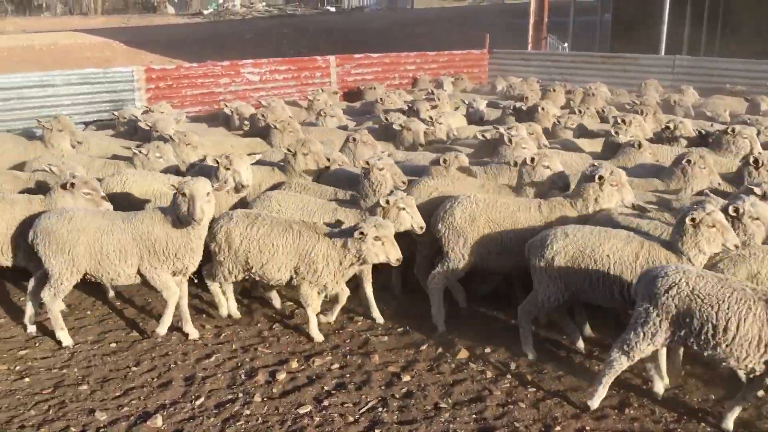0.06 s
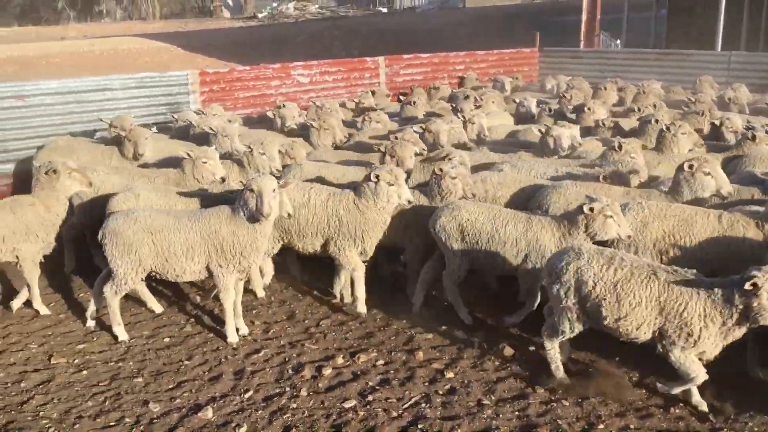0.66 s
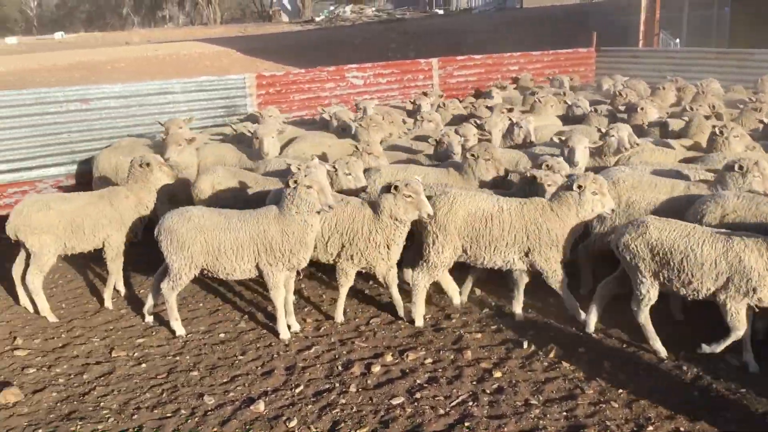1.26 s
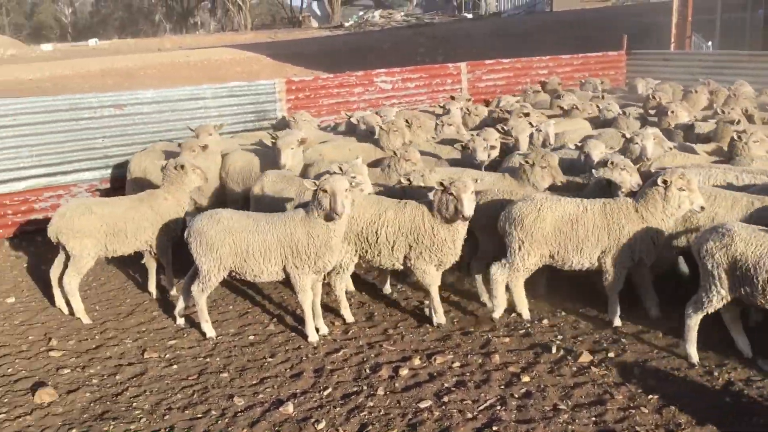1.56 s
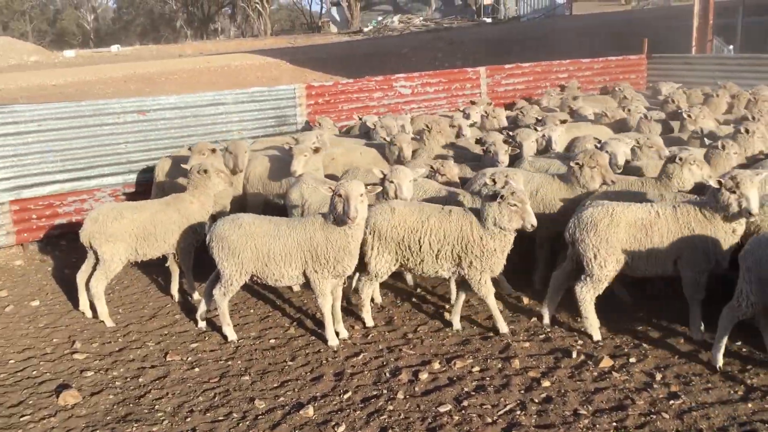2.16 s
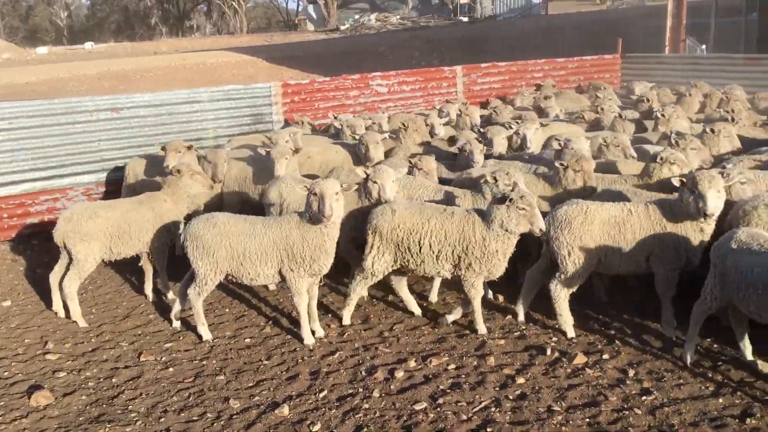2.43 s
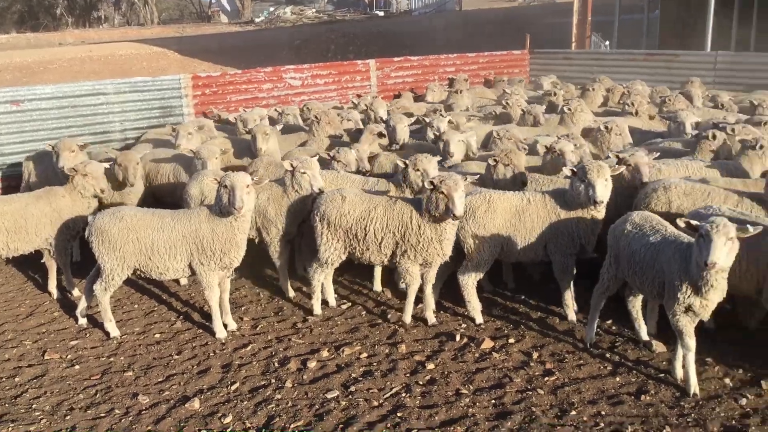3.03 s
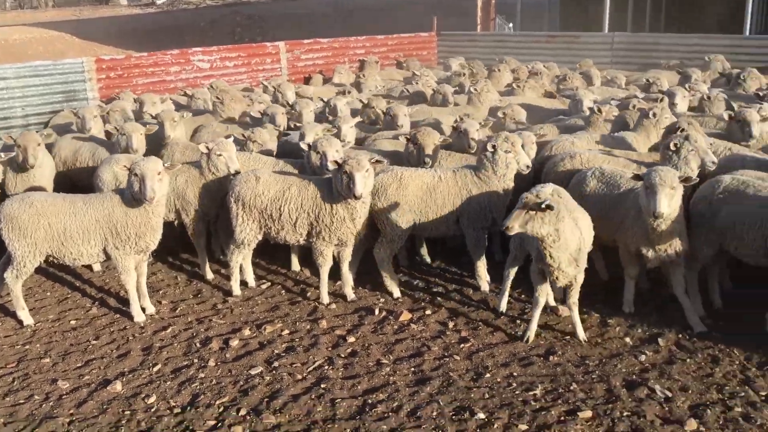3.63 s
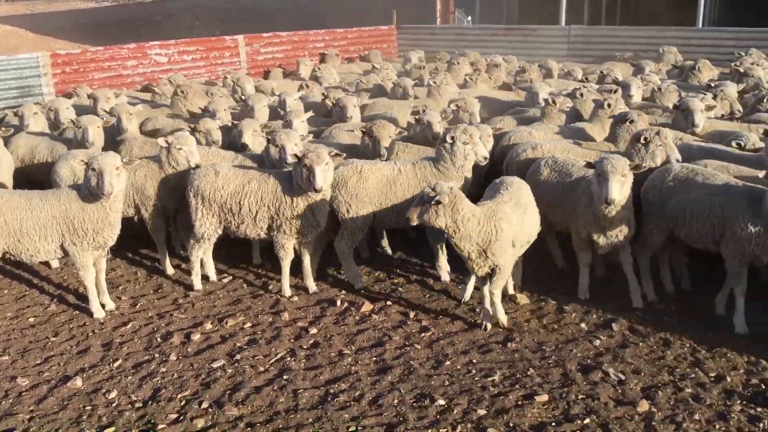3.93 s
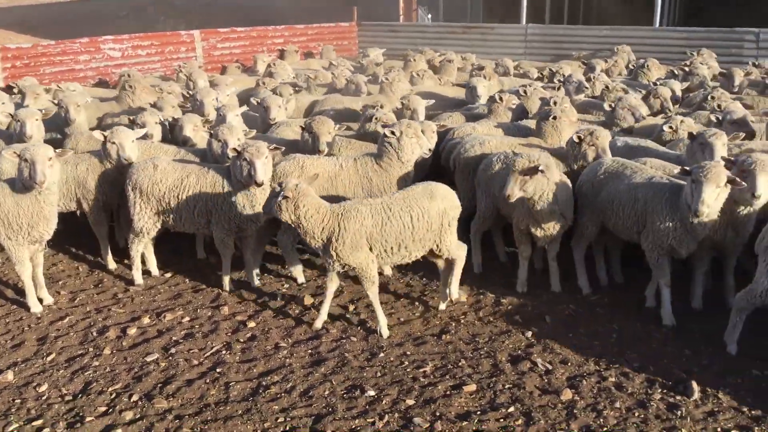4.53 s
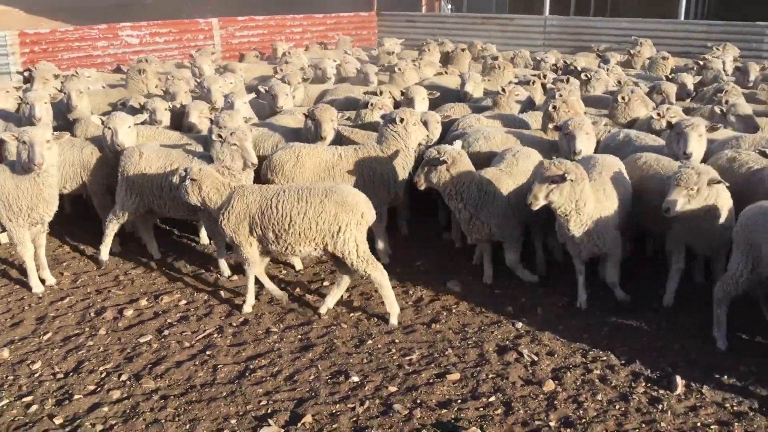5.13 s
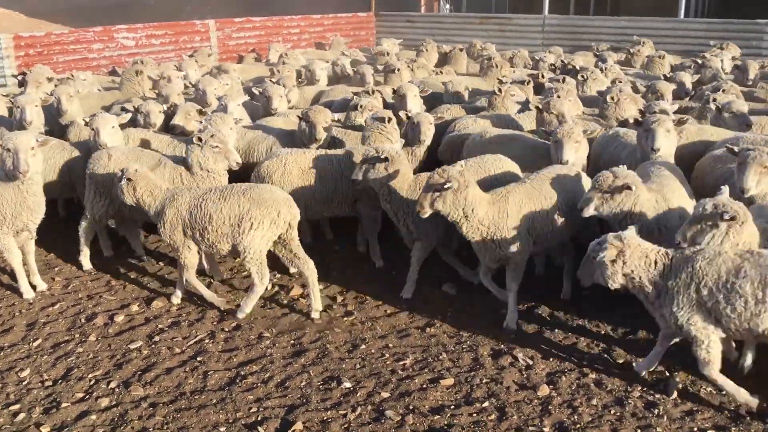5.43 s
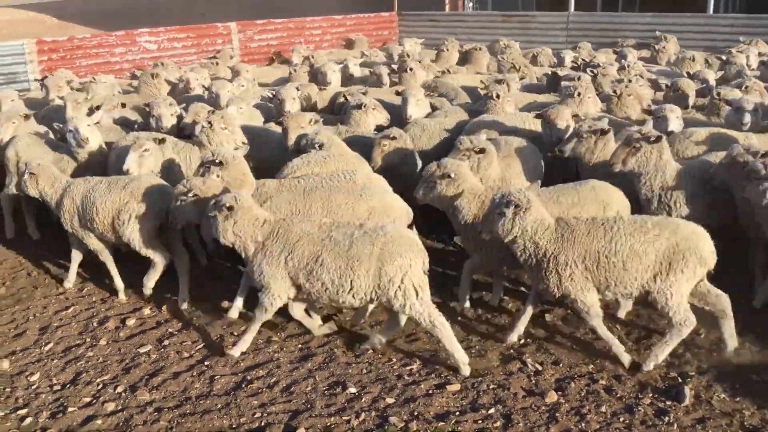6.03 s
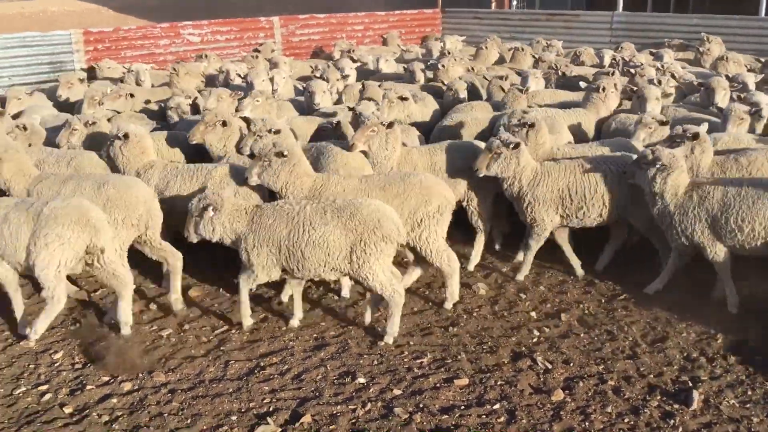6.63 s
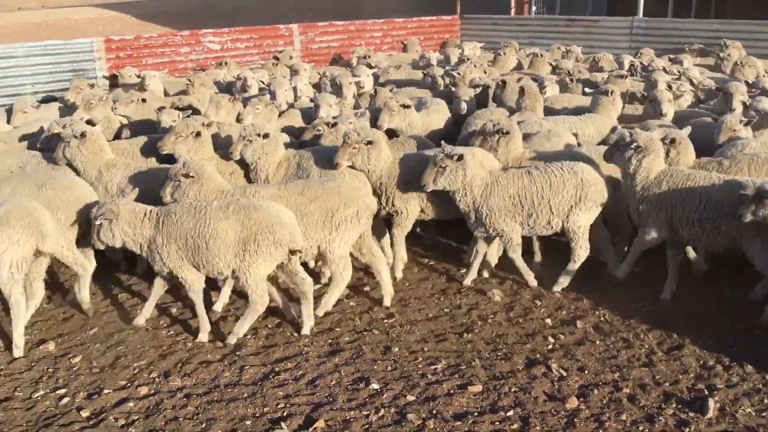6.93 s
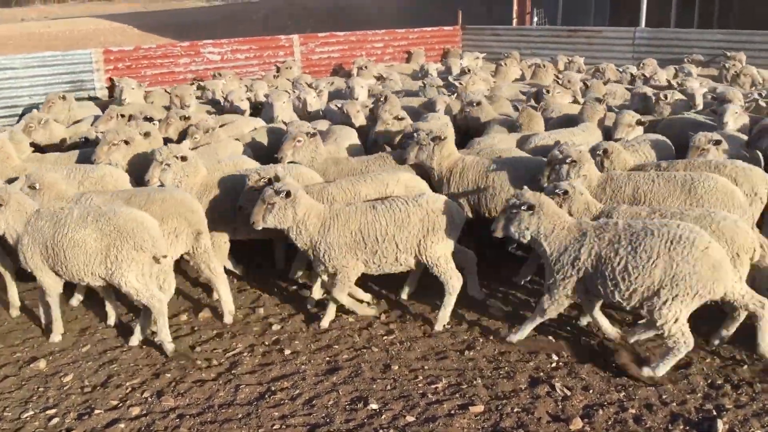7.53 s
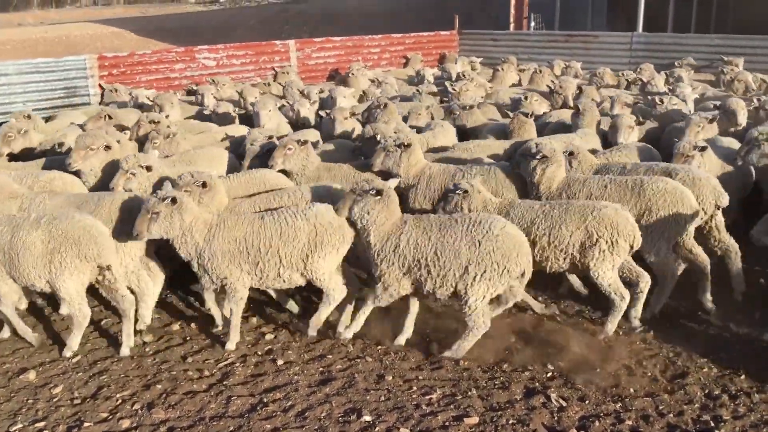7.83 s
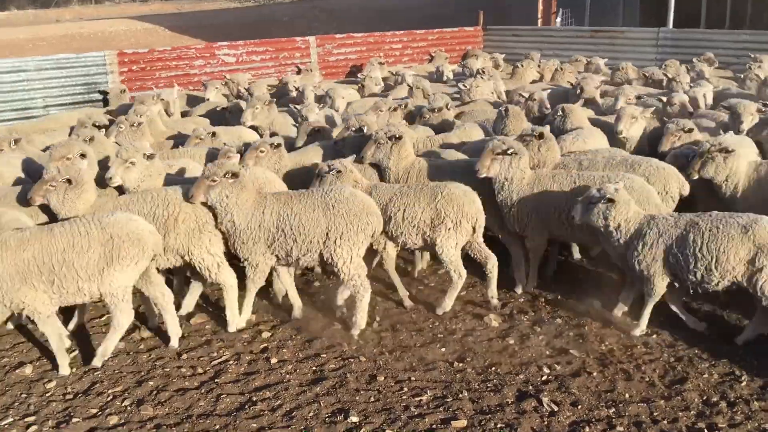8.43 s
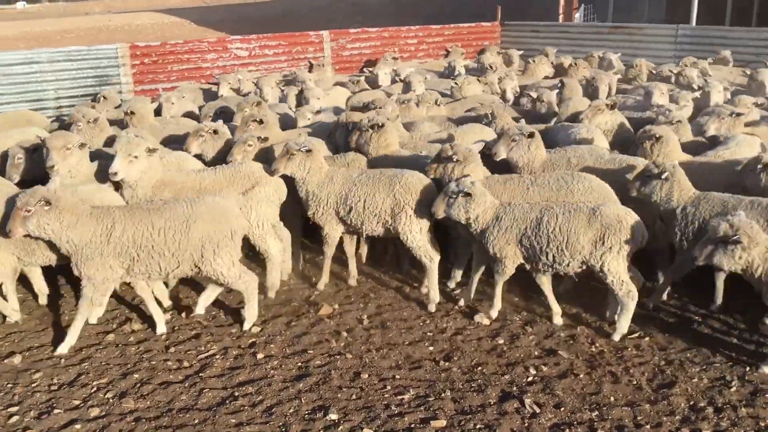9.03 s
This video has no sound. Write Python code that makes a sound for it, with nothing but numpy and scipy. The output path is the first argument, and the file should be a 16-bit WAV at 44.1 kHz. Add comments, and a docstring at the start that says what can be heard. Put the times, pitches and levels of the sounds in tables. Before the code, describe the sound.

Many sheep shuffle on dry dirt in an outdoor yard, their hooves softly crunching grit, scuffing and clicking against pebbles, while light wind puffs at the close microphone. The flock almost stops. About halfway through, a strong gust buffets the microphone with low thumps, the loudest sound. As it eases, the sheep run past with busier steps and scrapes under continuing puffs of wind.

```python
"""A dry dirt yard, one microphone close to a flock of sheep. At first they shuffle: near hooves thud,
crush grit, scuff and kick pebbles, far ones merge into a rustle, and wind puffs at the microphone.
From about 2 s the flock almost stops and fleeces brush softly. Near 5 s one strong gust buffets the
microphone with thumping eddies. As it eases the sheep run past, and something small tinks underfoot."""
import sys
import numpy as np
from scipy import signal
from scipy.fft import rfft, irfft
from scipy.io import wavfile
from scipy.ndimage import uniform_filter1d, map_coordinates

SR = 44100
rng = np.random.default_rng(int(sys.argv[2]) if len(sys.argv) > 2 else 0)


def to_wav(sig):
    """Store sig (one row per channel, or 1-D mono) as 16-bit WAV at the path in sys.argv[1].

    Samples outside -1..1 are clipped; the rate is SR.
    """
    pcm = np.clip(np.atleast_2d(sig), -1, 1) * 32767
    pcm = np.round(pcm).astype(np.int16)
    wavfile.write(sys.argv[1], SR, pcm.T)  # frames by channels


N = 408807
TIME = np.arange(N) / SR

# how busy the flock is; it shuffles, almost stops, then runs: (time [s], level [dB])
FLOCK_ACTIVITY = [(0, -60.5), (.17, -69.5), (.33, -66), (.95, -68.5), (1.3, -68.5), (1.92, -74),
                  (2.12, -71.5), (2.27, -77.5), (2.4, -73), (2.65, -75), (3.12, -71.5), (3.4, -74.5),
                  (4.4, -77), (5, -73), (5.55, -70), (5.9, -64.5), (6.95, -69.5), (7.7, -66.5), (9.26, -69)]
# fine grit is heard when the steps are close to the microphone: (time [s], treble [dB])
NEARNESS = [(0, -0.5), (6, -3), (7.3, 2.5)]
# the tone of hooves on dry dirt, with the microphone's rippled treble: (frequency [Hz], gain [dB])
GROUND_SOUND_COLOUR = [(120, -10), (330, 14), (620, 9.5), (950, 2.5), (1500, 0.5), (2700, -0.5),
                       (3500, -5.5), (4400, -5), (5000, -9.5), (5600, -7), (6300, -12), (7000, -9.5),
                       (8200, -19), (9600, -15.5), (11200, -19.5), (12500, -24), (15500, -18.5)]


def undb(db):
    """Decibels to gain."""
    return 10 ** (np.asarray(db) / 20)


def unit(x):
    """Scale to rms 1."""
    return x / np.sqrt(np.mean(x ** 2))


def curve(table):
    """Join (time, value) rows by straight lines."""
    return np.interp(TIME, *np.transpose(table))


def walk(rate):
    """Smooth random drift of rms 1, changing about rate times a second."""
    return unit(map_coordinates(rng.standard_normal(N // 20), [TIME * rate], order=3, mode="wrap"))


def edge(x, hz, kind, order=2):
    """Butterworth low-pass or high-pass."""
    return signal.sosfilt(signal.butter(order, min(hz, .45 * SR), kind, fs=SR, output="sos"), x)


def ring(x, hz, q):
    """One resonance, gain 1 at its centre."""
    return signal.lfilter(*signal.iirpeak(min(hz, .4 * SR), max(q, hz / (.4 * SR)), fs=SR), x)


def colour(x, points):
    """Minimum-phase filter through (frequency [Hz], gain [dB]) points."""
    hz, db = np.transpose(points)
    gain = undb(np.interp(np.log(np.fft.rfftfreq(2048, 1 / SR) + 1), np.log(hz), db))
    cepstrum = irfft(np.log(gain))
    half = len(cepstrum) // 2
    folded = np.r_[cepstrum[0], 2 * cepstrum[1:half], np.zeros(half)]
    return signal.fftconvolve(x, irfft(np.exp(rfft(folded))))[:len(x)]


def add(out, s, sound, db):
    """Mix a sound in at time s with a given peak level."""
    start = int(np.clip(s * SR, 0, N - 1))
    out[start:start + len(sound)] += (undb(db) * sound / np.abs(sound).max())[:N - start]


def impacts(rate, spread_db, size=N):
    """Impulses at random moments, most small and a few large."""
    return (rng.random(size) < rate / SR) * undb(spread_db * np.clip(rng.standard_normal(size), -2, 2))


def grains(rate, spread_db, size=N):
    """Breaking crumbs: impacts of either sign."""
    return impacts(rate, spread_db, size) * np.sign(rng.standard_normal(size))


def airflow(rise_s=.0022, fall_s=.023, lull_db=-8.5):
    """Wind strength at the microphone in dB: puffs ride on the breeze and lulls dip below it."""
    # the breeze, swelling to one strong gust: (time [s], level [dB])
    breeze = [(0, -53), (.6, -54), (.95, -50), (1.52, -50.5), (1.7, -57.5), (2.55, -50.5), (2.85, -54.5),
              (3.6, -47.5), (4.1, -49), (4.36, -53.5), (4.9, -33.5), (5.22, -27), (5.5, -34.5),
              (6.3, -44.5), (7.12, -51), (8.5, -51), (9.27, -47.5)]
    # separate puffs: (start [s], hold [s], level [dB])
    puffs = [(0.245, 0.05, -43), (0.977, 0.038, -44), (3.317, 0.042, -37.5), (4.914, 0.032, -30),
             (5.267, 0.036, -26.5), (5.358, 0.1, -37), (5.742, 0.039, -33.5), (5.868, 0.13, -36),
             (6.487, 0.06, -38), (6.878, 0.17, -38), (7.497, 0.038, -43), (8.09, 0.096, -40.5),
             (8.227, 0.093, -38), (8.72, 0.12, -42.5), (9.023, 0.11, -44.5), (9.238, 0.054, -38.5)]
    # the air drops away between gusts: (time [s])
    lulls = [.55, 2.8, 3.29, 4.36, 4.6, 4.78, 5.07, 5.33, 5.47, 5.68, 6.78, 7.12, 7.75, 8.42, 8.96]
    breeze_db = curve(breeze)
    power = undb(breeze_db) ** 2
    for s, hold, db in puffs:
        shape = np.interp(TIME, [s - rise_s, s, s + hold, s + hold + fall_s], [0, 1, 1, 0])
        power = power + (undb(db) * shape ** 2) ** 2
    lull_s = .05 * undb((np.median(breeze_db) - breeze_db) / 2)  # briefer in fast air
    dips = sum(np.exp(-((TIME - s) / lull_s) ** 2) for s in lulls)
    return 10 * np.log10(power) + lull_db * dips


def swirl(roll_hz):
    """The pressure pulse of one eddy; a quicker eddy reaches higher in pitch."""
    t = np.arange(-SR // 80, SR // 80) / SR
    return 1 / (1 + (2 * np.pi * roll_hz * t) ** 2) * np.hanning(len(t))


def mic_port(pressure, cut_hz=66):
    """The microphone port blocks slow pressure, booms above that limit and has small cavity resonances."""
    # how the port colours the wind: (frequency [Hz], gain [dB])
    port_tone = [(90, -1), (140, -1), (210, 2), (420, 3), (600, 9), (950, 6), (2000, 13.5)]
    passed = edge(pressure, cut_hz, "high", order=4)
    boom = .14 * ring(passed, 2.1 * cut_hz, q=35)
    return colour(passed + boom, port_tone)


def wind(size_spread_db=2, gain_db=1.96):
    """A stream of small eddies crosses the microphone: faster air makes them stronger and quicker."""
    # how quickly eddies pass; the late wind is slower and deeper: (time [s], base roll-off [Hz])
    eddy_pace = [(0, 145.5), (5.2, 151), (6.2, 125), (9.27, 102.5)]
    force_db = airflow()
    speed = undb(np.minimum(uniform_filter1d(force_db, size=900) + 25, 4)) ** .27
    roll_hz = curve(eddy_pace) * speed
    pressure = np.zeros(N)
    moments = rng.random(size=5000) * TIME[-1]
    for s, (size, pace, side) in zip(moments, rng.standard_normal((len(moments), 3))):
        eddy_hz = roll_hz[int(s * SR)] * undb(3.1 * np.clip(pace, -1.3, 1.3))
        pulse = np.sign(side) * swirl(eddy_hz)
        add(pressure, s - len(pulse) / 2 / SR, pulse, size_spread_db * size)
    pressure = unit(mic_port(pressure))
    # the stream is evened out so that it follows the strength of the gust
    power = uniform_filter1d(uniform_filter1d(pressure ** 2, size=1100), size=700)
    stream = pressure / np.sqrt(power + .02)
    # light air wavers more than a firm gust
    waver_db = 2 * walk(22) * np.interp(force_db, [-44, -34], [1.3, .5])
    return stream * undb(force_db + waver_db + gain_db)


def eddy_thumps():
    """The strongest eddies land as separate round thumps, each swinging the air at the port a few times."""
    # single strong eddies: (time [s], peak [dB], pitch [Hz])
    eddies = [(0.287, -30, 185), (0.689, -24, 140), (0.87, -30, 105), (1.029, -31, 90), (3.227, -33, 85),
              (3.344, -32, 170), (3.443, -30, 150), (3.714, -34, 330), (3.74, -30, 200), (4.158, -33, 135),
              (4.458, -31, 110), (4.541, -25, 150), (4.564, -25, 200), (4.646, -24, 155), (4.708, -29, 300),
              (4.813, -21, 215), (4.874, -16.5, 135), (4.921, -20, 170), (5.003, -21, 245),
              (5.03, -18, 180), (5.108, -17, 190), (5.124, -14, 260), (5.171, -13.5, 170),
              (5.186, -20, 380), (5.288, -15, 220), (5.365, -19, 400), (5.384, -15.5, 90),
              (5.395, -17, 210), (5.419, -13, 290), (5.51, -18.5, 205), (5.544, -15, 170),
              (5.633, -23, 140), (5.713, -21, 155), (5.751, -20, 110), (5.776, -21.5, 190),
              (5.948, -22, 125), (5.978, -23, 230), (6.124, -19.5, 160), (6.175, -29, 185),
              (6.226, -23.5, 280), (6.413, -26.5, 240), (6.499, -23, 240), (6.519, -26.5, 250),
              (6.547, -25.5, 105), (6.891, -26.5, 220), (6.916, -24, 175), (6.975, -23.5, 115),
              (7.051, -28, 120), (7.319, -30, 150), (7.552, -31, 140), (8.166, -23.5, 115),
              (8.242, -26, 175), (8.278, -26.5, 130), (8.304, -25, 160), (8.663, -31, 120),
              (8.773, -25.5, 82), (8.855, -28, 100)]
    out = np.zeros(N)
    for s, db, hz in eddies:
        steepness = undb(.76 * max(db + 17, 0))  # the hardest have a steep front that reaches higher
        dip = -swirl(hz * steepness)
        push = np.pad(dip, (0, 2 * len(dip)))
        thump = mic_port(ring(push, hz, q=2.2) + .17 * push)
        add(out, s - np.abs(thump).argmax() / SR, thump, db)
    return out


def fleeces(rough_db=5.5):
    """Wool rubs on wool: a soft hiss that swells and fades."""
    # fleeces brushing past each other: (start [s], length [s], level [dB])
    brushes = [(2.317, 0.27, -74.5), (2.815, 0.16, -74.5), (3.054, 0.18, -74)]
    # the sheen of rubbed wool: (frequency [Hz], gain [dB])
    wool_tone = [(800, -18), (2400, 1), (3600, -11), (5300, -3), (7500, -17), (15000, -38)]
    swell = sum(undb(db) * np.sin(np.pi * np.clip((TIME - s) / length, 0, 1))
                for s, length, db in brushes)
    return swell * undb(rough_db * walk(60)) * unit(colour(rng.standard_normal(N), wool_tone))


def tink():
    """Something small and hard is kicked and rings high."""
    # its metallic modes: (frequency [Hz], relative level [dB], time to fall 60 dB [s])
    modes = [(9227, 0, .024), (13300, -7, .02)]
    out, t = np.zeros(N), TIME[:SR // 8]
    ringing = sum(undb(db - 60 * t / t60) * np.sin(2 * np.pi * hz * t) for hz, db, t60 in modes)
    add(out, s=6.425, sound=ringing, db=-46)
    return out


def chips(snap_db=-7, sand_db=-19, crisp=.22):
    """Stone chips snap under the nearest hooves and kicked sand sizzles, louder the busier the flock."""
    # each size of chip snaps at its own pitch: (pitch [Hz])
    chip_pitches = (2000, 3400, 5600, 9600)
    busy = undb(curve(FLOCK_ACTIVITY) + curve(NEARNESS))
    snaps = 0
    for hz in chip_pitches:
        cracks = grains(rate=7, spread_db=5)
        knocks = edge(cracks, hz / 2, "high", order=1) + 2 * ring(cracks, hz, q=3.2)
        snaps = snaps + colour(knocks, GROUND_SOUND_COLOUR) + crisp * cracks
    sand = edge(grains(rate=900, spread_db=8) * undb(2 * walk(30)), 12000, "high")
    return busy * (undb(snap_db) * unit(snaps) + undb(sand_db) * unit(sand))


def pebbles(gain_db=-1, body=2.35):
    """A sharp crack rings a pebble briefly; grit settles after it."""
    # hooves knocking pebbles: (time [s], peak before gain [dB], pitch [Hz])
    kicks = [(0.311, -39.5, 4000), (0.4574, -42, 2610), (1.138, -40, 3200), (1.201, -40.5, 2400),
             (1.958, -38, 3300), (2.116, -44.5, 6260), (2.458, -42.5, 2360), (2.801, -45, 2700),
             (3.088, -47, 5500), (3.098, -45, 4900), (4.65, -43, 2920), (5.326, -32.5, 4700),
             (5.361, -36.5, 6640), (6.271, -43, 3090), (6.596, -43.5, 6800), (6.744, -41, 2600),
             (6.772, -43, 3800), (7.062, -43, 6500), (7.078, -44, 8000), (7.168, -40.5, 4600),
             (7.243, -38.5, 9600), (7.44, -42, 2110), (7.483, -37, 5900), (7.704, -36, 7000),
             (7.838, -37.5, 10700), (8.332, -38, 2300), (8.404, -40.5, 2700), (8.612, -39, 5000),
             (8.707, -40, 11200), (8.822, -42.5, 4000), (8.968, -36.5, 5660), (9.049, -38, 5000),
             (9.109, -38, 2900), (9.202, -41, 13400)]
    out, t = np.zeros(N), TIME[:SR // 15]
    contact = (1 - np.exp(-t / .0003)) * np.exp(-t / .0008)
    settling = .12 * np.exp(-t / .008)
    for s, db, hz in kicks:
        crack = contact * rng.standard_normal(len(t))
        crack += settling * unit(grains(rate=3600, spread_db=17, size=len(t)))
        # a smaller stone radiates less bass and snaps more brightly
        knock = edge(crack, hz / 4, "high", order=1) + body * ring(crack, hz, q=2.7)
        snap = hz / 32000 * edge(crack, 6000, "high", order=1)
        add(out, s, colour(knock, GROUND_SOUND_COLOUR) + snap, db + gain_db)
    return out


def scuffs(gain_db=-9, body=.83):
    """A sliding hoof tears up a spray of grains that builds over its slide time and dies away."""
    # hooves scraping the dirt: (time [s], peak before gain [dB], pitch [Hz], slide [s])
    slides = [(0.056, -33, 1260, .004), (0.09, -33, 1140, 0.0032), (0.27, -36.5, 1400, 0.011),
              (0.432, -39, 2000, 0.0084), (0.886, -32, 1480, 0.0033), (1.135, -31, 1900, 0.0022),
              (1.26, -32, 1230, 0.0049), (1.3863, -38, 2470, 0.0074), (1.862, -38, 1520, 0.0072),
              (2.92, -44, 2200, 0.038), (4.314, -44, 1700, 0.0087), (4.519, -36, 2400, 0.011),
              (5.7432, -35.5, 1170, 0.0044), (5.792, -31, 1380, 0.0027), (7.252, -26, 1490, 0.0047),
              (7.818, -32.5, 1900, 0.011), (7.934, -32, 2300, 0.0036), (8.294, -32.5, 2550, 0.0064),
              (8.364, -35, 2360, 0.0084)]
    out, t = np.zeros(N), TIME[:SR // 5]
    for s, db, hz, slide_s in slides:
        spray = grains(rate=4000, spread_db=9, size=len(t)) * t * np.exp(-t / slide_s)
        scrape = colour(spray + body * ring(spray, hz, q=4.7), GROUND_SOUND_COLOUR)
        add(out, s - .004, scrape, db + gain_db)
    return out


def stamps():
    """A hoof lands flat with a short hollow knock."""
    # hooves stamping on packed earth: (time [s], peak [dB], pitch [Hz])
    landings = [(0.661, -41, 670), (2.106, -47.5, 596)]
    out, t = np.zeros(N), TIME[:SR // 15]
    for s, db, hz in landings:
        blow = rng.standard_normal(len(t)) * np.exp(-t / .003)
        add(out, s, edge(ring(blow, hz, q=3.1), 1300, "low"), db)
    return out


def footfalls(rate, spread_db, crush_s):
    """Pressure of many hooves on the ground: each step builds quickly and dies away."""
    t = TIME[:SR // 4] / crush_s
    load = signal.fftconvolve(impacts(rate, spread_db) ** 2, t * np.exp(-t))[:N].clip(0)
    return np.sqrt(load / (uniform_filter1d(load, size=SR // 3) + 1e-9))


def flock(grit_db=1.5, rustle_db=-1, thud_db=-9, floor_db=-72, hiss_db=-89):
    """Near steps thud and crush grit, far steps blur into a rustle, over a faint low murmur and hiss."""
    busy_db = curve(FLOCK_ACTIVITY) + 2.5
    # when the flock slows, the near sheep stand still first and the far rustle remains
    near = undb(.35 * np.minimum(busy_db + 66, 0))
    steps = footfalls(rate=65, spread_db=3.1, crush_s=.0045)
    grit = 0
    for hz in (700, 1400, 2800, 5600, 11200):
        # every patch of ground has its own mix of grain sizes
        grit = grit + ring(grains(rate=3000, spread_db=10) * undb(2 * walk(35)), hz, q=2)
    crunch = undb(grit_db) * unit(colour(grit * steps, GROUND_SOUND_COLOUR))
    rustle = undb(rustle_db) * unit(colour(rng.standard_normal(N), GROUND_SOUND_COLOUR))
    dirt = near * crunch + rustle
    fine_grit = signal.sosfiltfilt(signal.butter(2, 7500, "high", fs=SR, output="sos"), dirt)
    dirt = dirt + fine_grit * (undb(curve(NEARNESS)) - 1)
    blows = grains(rate=900, spread_db=3.5) * steps
    thuds = undb(thud_db) * unit(edge(edge(blows, 500, "low", order=4), 210, "high"))
    murmur_gain = undb(floor_db + walk(.74))
    murmur = unit(edge(ring(rng.standard_normal(N), 310, q=.57), 720, "low", order=4))
    hiss = undb(hiss_db) * rng.standard_normal(N)
    return (dirt + thuds) * undb(busy_db) + murmur_gain * murmur + hiss


def scene():
    """Wind at the microphone and sheep in the yard, in mono."""
    air = wind() + eddy_thumps()
    sheep = flock() + chips() + fleeces() + pebbles() + scuffs() + stamps() + tink()
    return (air + sheep)[None]


def record(dry, bottom_hz=48, top_hz=16000):
    """The recorder cuts the deepest rumble and the top."""
    top_cut = signal.ellip(10, .2, 70, top_hz, fs=SR, output="sos")
    return signal.sosfilt(top_cut, edge(dry, bottom_hz, "high", order=3))


dry = scene()
out = record(dry)
to_wav(out)
```